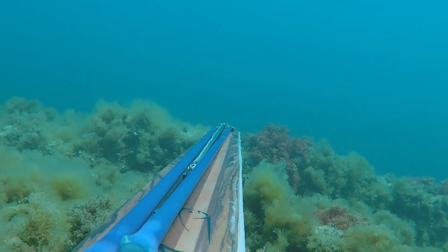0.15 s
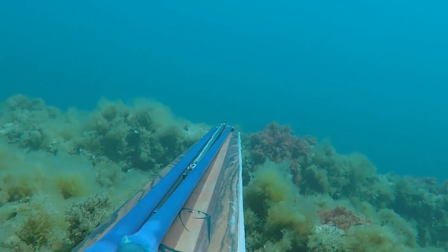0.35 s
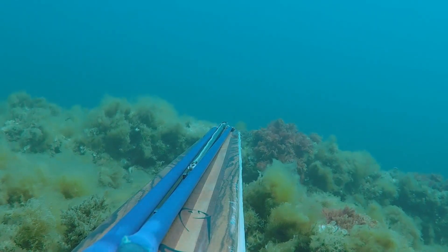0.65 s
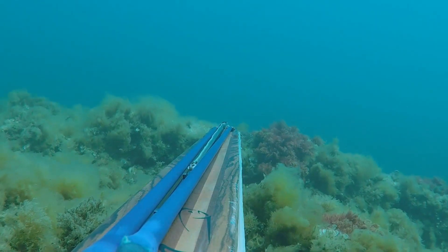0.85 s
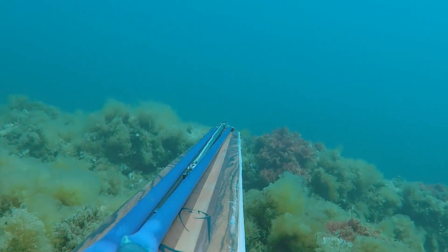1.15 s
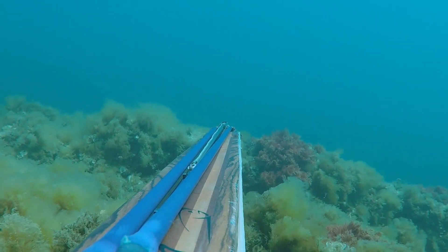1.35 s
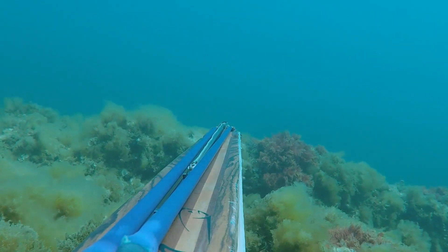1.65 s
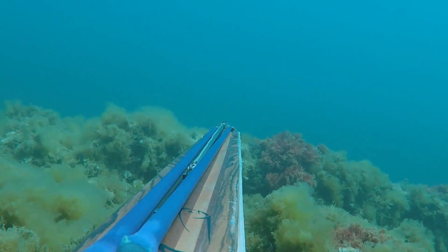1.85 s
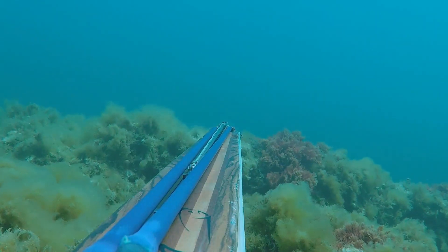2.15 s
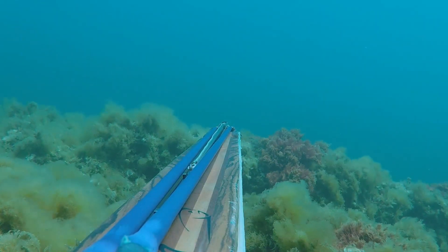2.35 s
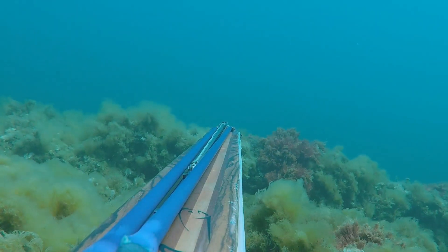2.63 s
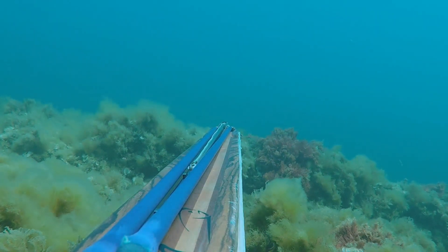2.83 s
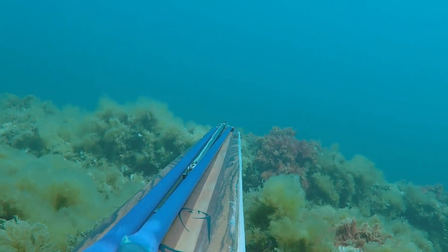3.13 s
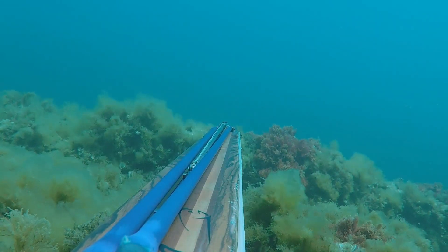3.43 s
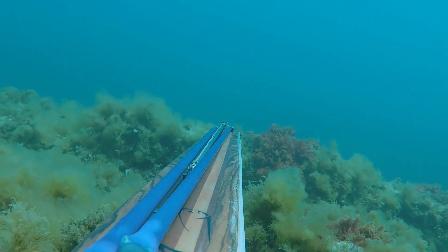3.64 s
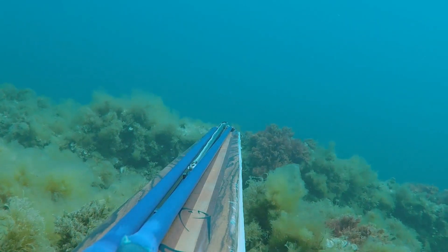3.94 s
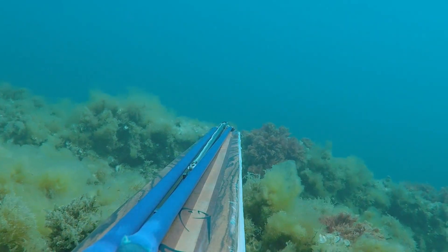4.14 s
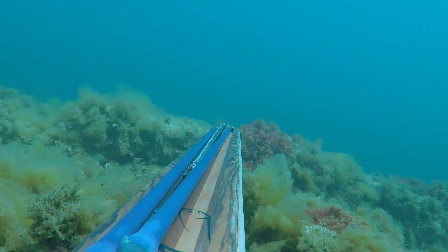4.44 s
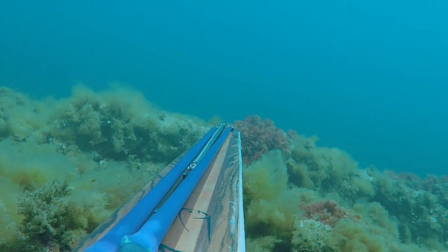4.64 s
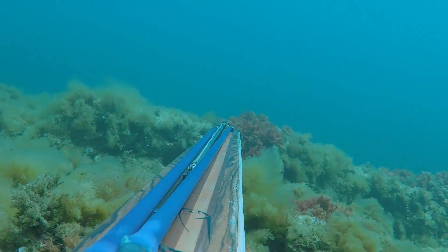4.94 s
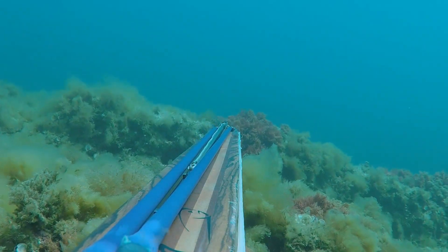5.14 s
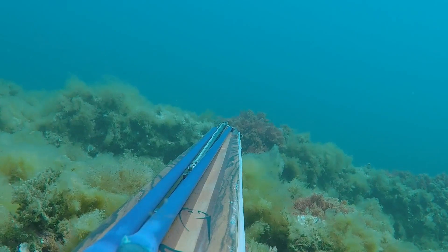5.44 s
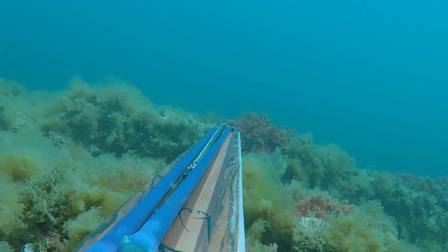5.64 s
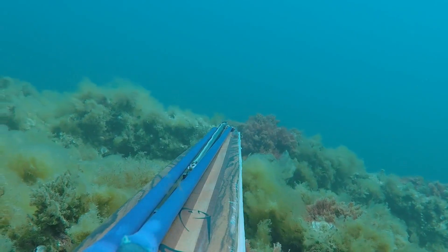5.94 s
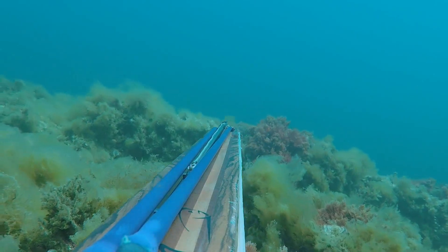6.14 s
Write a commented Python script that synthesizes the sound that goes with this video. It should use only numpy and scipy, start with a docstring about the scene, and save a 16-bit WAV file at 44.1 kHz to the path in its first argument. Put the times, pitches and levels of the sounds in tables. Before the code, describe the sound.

Underwater over a rocky, weedy seabed, snapping shrimp make a continuous frying crackle: a dense distant fizz with separate brittle ticks on top. Nearby snaps pop out irregularly, the strongest around three to four seconds. Low water rumble and slight hiss lie beneath. Soft, dull bumps touch the case before two seconds, and a faint rub comes near the end. The microphone sits inside a waterproof housing, giving the clicks a hard, boxy midrange ring.

```python
"""Snapping shrimp crackle and fizz over a weedy, rocky seabed, heard by a camera in a waterproof housing.
Each snap is a click coloured by the housing, strongest near 2 kHz, with a surface echo and rock scatter.
Water flow is shaped noise with a low rumble; the electronics whine as a thin comb of steady sines.
Near snaps stand out; the case takes soft bumps (swelling low tones), one small bubble pips,
and a faint rub near the end is a train of random slips through low case resonances."""
import sys
import numpy as np
from scipy import signal
from scipy.fft import rfft, irfft
from scipy.io import wavfile
from scipy.ndimage import uniform_filter1d

SR = 44100
rng = np.random.default_rng(int(sys.argv[2]) if len(sys.argv) > 2 else 0)


def unload_wav(signal):
    """Save mono or channel-first audio to the path in sys.argv[1] as 16-bit WAV at rate SR, clipped to [-1, 1]."""
    wavfile.write(
        sys.argv[1],
        SR,
        np.round(np.clip(np.atleast_2d(signal).T, -1, 1) * 32767).astype(np.int16),
    )


N = 276939
SIZE = 2048  # samples in one snap or impulse response
TIME_S = np.arange(N) / SR
FREQ_HZ = np.arange(SIZE // 2 + 1) * SR / SIZE


def undb(db):
    """Decibels to amplitude gain."""
    return 10 ** (np.asarray(db) / 20)


def level(x, rms_db):
    """Scale to an rms level."""
    return x * undb(rms_db) / np.sqrt(np.mean(x ** 2))


def unit(x):
    """Scale to unit energy."""
    return x / np.linalg.norm(x)


def contour(hz, points):
    """Gain through (frequency [Hz], level [dB]) points, linear in dB over log frequency."""
    at_hz, db = np.transpose(points)
    return undb(np.interp(np.log(hz + 1), np.log(at_hz), db))


def fade(points):
    """Gain over time through (time [s], level [dB]) points."""
    at_s, db = np.transpose(points)
    return undb(np.interp(TIME_S, at_s, db))


def resonances(modes):
    """Power sum of steep-sided resonances, as gain; each is 6 dB down half a width off centre."""
    power = 0
    for hz, width_hz, db in modes:
        detune = (FREQ_HZ - hz) / width_hz
        power = power + undb(db) ** 2 / (1 + 1.64 * detune ** 2) ** 4
    return np.sqrt(power)


def ring(gain):
    """Minimum-phase impulse response of a gain curve, by folding its cepstrum."""
    cepstrum = irfft(np.log(gain + 1e-5))
    cepstrum[1:SIZE // 2] *= 2
    cepstrum[SIZE // 2 + 1:] = 0
    return irfft(np.exp(rfft(cepstrum)))


def add(out, start_s, sound):
    """Mix a sound in at a time."""
    i = max(int(start_s * SR), 0)
    out[i:i + len(sound)] += sound[:max(N - i, 0)]


def walk(rate_hz):
    """Slow random drift of unit rms: held noise, smoothed twice."""
    k = int(SR / rate_hz)
    steps = np.repeat(rng.standard_normal(N // k + 1), k)
    smooth = uniform_filter1d(uniform_filter1d(steps, k), k)
    return level(smooth[:N], 0)


# housing resonances: (frequency [Hz], width [Hz], relative level [dB])
HOUSING_MODES = [(860, 630, -31.5), (1317, 31, -17.5), (1663.5, 258, -1), (2102, 462, 0.5),
                 (2334, 239, 1.5), (2923, 580, -10.5), (3638, 370, -9.5), (4064, 480, -7.5),
                 (4874, 830, -14.5), (6020, 1310, -13.5), (7540, 1490, -18), (9510, 1300, -18.5),
                 (10870, 1250, -22.5), (12500, 1300, -25.5), (14300, 1800, -29.5)]


def housing_gain():
    """Gain of the waterproof housing, whose resonances every snap rings."""
    return resonances(HOUSING_MODES)


UPPER_RING_SHARE, UPPER_RING_DB = 0.55, 1.5  # 3.1-4.2 kHz ring follows the snap's treble
BODY_DB, BODY_DB_PER_DB = -4.5, 1.0  # low body grows as a snap gets closer and drier
SOAK_DB_PER_DB = 0.28  # weed soaks up the highest treble of wetter snaps


def snap_colour(top_db, wet_db, patchy_db):
    """Path gain: weed and rock shade random bands, and distance thins the body and highest treble."""
    bands_hz = np.geomspace(1500, 15000, num=9)
    patches = np.interp(FREQ_HZ, bands_hz, rng.standard_normal(9))
    shade = undb(patchy_db * undb(wet_db) * patches)
    mid_db = UPPER_RING_SHARE * top_db + UPPER_RING_DB
    low_db = min(mid_db + 7, 0)  # the dullest snaps also lose the main ring's low skirt
    body_db = BODY_DB - BODY_DB_PER_DB * wet_db
    slant_db = SOAK_DB_PER_DB * wet_db
    points = [(500, low_db + BODY_DB), (950, low_db + body_db), (1250, low_db / 2),
              (1600, 0), (2300, 0.0047), (3100, mid_db), (4200, mid_db),
              (5200, top_db + slant_db), (12500, top_db - slant_db)]
    return contour(FREQ_HZ, points) * shade


ECHO_S, ECHO_BLUR_S = 0.0066, 0.00068  # mean surface path delay, ripple blur
RIPPLE_DB = -3  # rippled part of the echo, relative to its mirror part
SMEAR_S, SCATTER_RISE_S, SCATTER_DECAY_S = 0.00048, 0.0054, 0.015


def snap(housing, top_db, wet_db, patchy_db, echo_db=-12, echo_spread=0.3, smear_db=0, scatter_db=-10.5):
    """Collapsing shrimp bubble by direct, glancing, surface and rock-scattered paths."""
    t = np.arange(SIZE) / SR
    response = ring(housing * snap_colour(top_db, wet_db, patchy_db))
    smear, ripple, scatter = rng.standard_normal((3, SIZE))

    def via(sound, paths):
        return unit(signal.fftconvolve(sound, paths)[:SIZE])

    # glancing paths blur the edge, more so for farther snaps
    glancing = unit(smear * t * np.exp(-t / SMEAR_S))
    click = via(response, (t == 0) + undb(smear_db + 2 * wet_db) * glancing)
    # the surface returns the click inverted
    lag_s = ECHO_S * (1 + echo_spread * (2 * rng.random() - 1))
    mirror = np.arange(SIZE) == int(lag_s * SR)
    rippled = unit(ripple * np.exp(-((t - lag_s) / ECHO_BLUR_S) ** 2))
    echo = via(click, undb(RIPPLE_DB) * rippled - mirror)
    scatter_envelope = np.exp(-t / SCATTER_DECAY_S) * (1 - np.exp(-t / SCATTER_RISE_S))
    scattered = via(click, scatter * scatter_envelope)
    late = undb(echo_db) * echo + undb(scatter_db + wet_db / 2) * scattered
    return (click + late) / np.sqrt(np.mean(click[t < .0034] ** 2))  # unit rms early click


def colony(rate_hz, spread_db, ceiling_db, rms_db, top_db, variety_db, count, bunching_db):
    """Burrows of differing colour snap at random in loose bunches; most snaps are far and weak."""
    housing = housing_gain()
    burrows = [snap(housing, bright_db, 0, patchy_db=6)
               for bright_db in top_db + variety_db * np.linspace(-1, 1, count)]
    hit = rng.random(N) < rate_hz / SR * undb(bunching_db * walk(25))
    size_db = spread_db * rng.exponential(size=N)
    size = undb(ceiling_db * np.tanh(size_db / ceiling_db))
    which = rng.integers(count, size=N)
    out = np.zeros(N)
    for i in np.flatnonzero(hit):
        add(out, i / SR, size[i] * burrows[which[i]])
    return level(out, rms_db)


# shared swell of ticks and fizz: (time [s], level [dB])
CRACKLE_SWELL = [(0.0, 2.5), (0.39, 0.5), (0.78, -2), (1.18, -0.7), (1.57, -1), (1.96, 1.4), (2.36, -1),
                 (2.75, 0.8), (3.14, -0.2), (3.53, -0.7), (3.92, 2.6), (4.32, 0.6), (4.71, 1.5), (5.1, 0),
                 (5.5, 1.1), (5.89, 1.5), (6.28, 1.2)]


def crackle():
    """Separate ticks from nearby rocks over the fizz of the whole reef, swelling and easing together."""
    # rms levels before the swell
    ticks = colony(rate_hz=150, spread_db=7.0, ceiling_db=16.0, rms_db=-50.0,
                   top_db=0, variety_db=13.5, count=90, bunching_db=0.75)
    fizz = colony(rate_hz=1100, spread_db=4.5, ceiling_db=13.5, rms_db=-53.5,
                  top_db=4, variety_db=11.5, count=40, bunching_db=3.5)
    return (ticks + fizz) * fade(CRACKLE_SWELL)


# spectrum of flow and hiss: (frequency [Hz], relative density [dB per Hz])
FLOW_SPECTRUM = [(12, -11.5), (28, 2), (58, 0.5), (75, -7.5), (92, -10.5), (105, -13.5), (135, -17.5),
                 (190, -21.5), (300, -25.5), (600, -28), (1200, -32.5), (4000, -37), (9000, -28.5),
                 (16000, -43)]
FLOW_RMS_DB = -52.5


def flow():
    """Water sliding past the case: noise shaped to a low, steady rumble over an even hiss."""
    hz = np.arange(N // 2 + 1) * SR / N
    spectrum = rfft(rng.standard_normal(N)) * contour(hz, FLOW_SPECTRUM)
    return level(irfft(spectrum, N), FLOW_RMS_DB)


# comb of electronic lines: (frequency [Hz], rms level [dB])
WHINE_LINES = [(8430, -80), (8460, -79), (8490, -85), (8520, -82), (8550, -82)]


def whine():
    """Camera electronics: steady sines at random phases."""
    return sum(level(np.sin(2 * np.pi * (hz * TIME_S + rng.random())), db) for hz, db in WHINE_LINES)


USUAL_DB, DRY_DB_PER_DB = -36, 0.59  # snaps louder than usual are closer and so drier
HIDDEN_DB_PER_DB = 0.23  # snaps dulled by rocks in the way carry more scatter
# near snaps, before the trims: (time [s], level [dB], treble [dB], surface echo [dB])
NEAR_SNAPS = [(0.41, -37.0, 6, -14), (0.4648, -35, -0.5, 3), (0.4886, -35.5, 0, -8),
              (0.6269, -33.5, 3, -6.5), (0.7429, -33.5, -25, -13), (0.776, -39.0, -11, -20),
              (0.987, -35, 1.5, -14), (1.018, -35.5, 13, -18), (1.1303, -44, 7, -14),
              (1.302, -40, -4.5, 3.5), (1.3617, -41, 26, -20), (1.4703, -36, -11, -10),
              (1.5236, -35.5, -26, -17), (1.8536, -38.5, 0, -10), (1.871, -35.5, 0, -10),
              (1.904, -30, -0.5, -13), (1.9801, -38, 0, -22), (2.015, -37.5, -2, -7),
              (2.0298, -34.5, -1, -11), (2.0598, -33, -13, -21), (2.1077, -38, -10, 6.5),
              (2.131, -34.5, 4, -4), (2.1538, -37.5, 3, -11), (2.1924, -35, -10, -8),
              (2.2823, -36.5, -2, -6), (2.3395, -38, 6, -16), (2.4413, -38.5, 7, -15),
              (2.4966, -36.5, 8, -8), (2.5099, -40, 1, 7.5), (2.6551, -36.5, -1, -13),
              (2.6671, -30.5, -2, -12), (2.692, -31, -7, -12), (2.755, -33, -13, -22),
              (2.784, -32.5, -14, -19), (2.8692, -34, 1, -8), (2.9375, -34.5, -1, -3),
              (2.966, -19.5, 0, -6.5), (2.9936, -34.5, 2, -8), (3.0899, -33, 3.5, -18),
              (3.2136, -34, -3.5, -10), (3.28, -34, 2, -4), (3.5918, -35.5, 0, -12),
              (3.6242, -39.5, 5, 2.5), (3.7838, -37, 0, -12), (3.793, -38, -1, -20),
              (3.7969, -13.5, -9.5, -12), (3.8282, -24.5, -20, 3), (3.926, -38.5, -10, -3),
              (3.999, -30, -15, -14), (4.002, -21, -35, -3), (4.069, -37, -10, -22),
              (4.1626, -35.5, -2.5, 2.5), (4.2404, -39.5, -12, -14), (4.6008, -34.5, 4, -15),
              (4.669, -36.5, 2, 4.5), (4.6959, -31.5, -4, -11), (4.833, -38, 0, 6.5), (4.903, -39, 4, -4),
              (4.9797, -33, -16, -6), (5.0182, -33.5, 0.5, -8), (5.068, -34, -9, -8),
              (5.0864, -38.5, 16, -8), (5.1343, -35, -12, -19), (5.23, -35, 5.5, -11),
              (5.3634, -36.5, -2, -5), (5.375, -36.5, 0.5, 4), (5.518, -40.5, -5, -5),
              (5.55, -33.0, -23, -26), (5.642, -33.0, -15, -18), (5.737, -36, -5, -20),
              (5.7416, -26.5, -4.5, -6.5), (5.7736, -34, -2, -16), (5.7954, -41, 21, -20),
              (5.8649, -30.5, -3.5, -23), (5.8916, -35, -3, 0), (5.936, -36, -16, -9),
              (6.0129, -31.5, 2.5, -3.5), (6.0564, -35.5, -16, -4), (6.1529, -35.5, 0, -4)]


def near_snaps(trim_db=0.85, treble_trim_db=-1.76, echo_trim_db=-0.5, rocks_db=-12.0):
    """Close shrimp; the closer a snap, the further it stands out from its scatter."""
    out, housing = np.zeros(N), housing_gain()
    for start_s, db, top_db, echo_db in NEAR_SNAPS:
        wet_db = DRY_DB_PER_DB * (USUAL_DB - db)
        scatter_db = rocks_db - HIDDEN_DB_PER_DB * min(top_db, 0)
        sound = snap(housing, top_db + treble_trim_db, wet_db, patchy_db=2.5,
                     echo_db=echo_db + echo_trim_db, echo_spread=0.12,
                     smear_db=-2.5, scatter_db=scatter_db)
        add(out, start_s, undb(db + trim_db) * sound)
    return out


def blips(rows, octave_db=-np.inf):
    """Sines with an optional octave overtone, each swelling and dying under a skewed sine-squared."""
    out = np.zeros(N)
    for start_s, length_s, hz, db in rows:
        t = np.arange(int(length_s * SR)) / SR
        overtone = undb(octave_db) * np.sin(2 * np.pi * 2 * hz * t)
        tone = np.sin(2 * np.pi * hz * t) + overtone
        swell = np.sin(np.pi * (t / length_s) ** 0.78) ** 2
        add(out, start_s, undb(db) * swell * tone)
    return out


# soft bumps: (start [s], length [s], pitch [Hz], fundamental's amplitude [dB])
CASE_BUMPS = [(1.704, 0.038, 132, -39), (1.899, 0.033, 127, -38.5), (1.9, 0.046, 42, -38.5)]


def bumps():
    """Soft knocks on the case: brief low tones with a weak octave."""
    return blips(CASE_BUMPS, octave_db=-23)


# small bubble: (start [s], length [s], pitch [Hz], amplitude [dB])
FREED_BUBBLES = [(4.1385, 0.011, 1520, -42)]


def bubbles():
    """A small bubble breaking free: one brief pure tone."""
    return blips(FREED_BUBBLES)


# low case resonances: (frequency [Hz], width [Hz], relative level [dB])
RUB_RESONANCES = [(324, 94, -0.5), (597, 130, -4.5), (930, 130, -9), (1070, 170, -2), (1220, 190, -6)]
# rub loudness: (time [s], level [dB])
RUB_LEVEL = [(6.03, -86), (6.05, -61.5), (6.12, -57.5), (6.145, -64), (6.17, -59), (6.21, -66), (6.27, -82)]


def rub(slip_rate_hz=500):
    """Something rubs the case: dense random slips stir its low resonances."""
    slip = rng.random(N) < slip_rate_hz / SR
    slips = slip * rng.uniform(0.56, 1, N) * rng.choice([-1, 1], N)
    body = signal.fftconvolve(slips, ring(resonances(RUB_RESONANCES)))[:N]
    started = TIME_S > RUB_LEVEL[0][0]
    return level(body, 0) * fade(RUB_LEVEL) * started


def scene():
    """Sum of all sources at one microphone inside the housing."""
    mix = crackle() + flow() + whine() + near_snaps() + bumps() + bubbles() + rub()
    return mix[None]


def record(dry):
    """The camera cuts the top: steep elliptic low-pass."""
    lowpass = signal.ellip(8, .2, 70, 15500, fs=SR, output="sos")  # ripple, stopband [dB], edge [Hz]
    return signal.sosfilt(lowpass, dry)


dry = scene()
out = record(dry)
unload_wav(out)
```